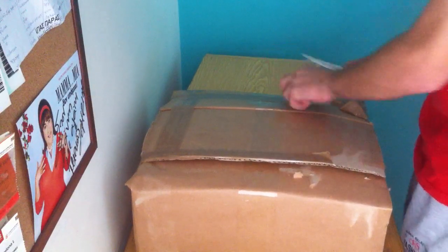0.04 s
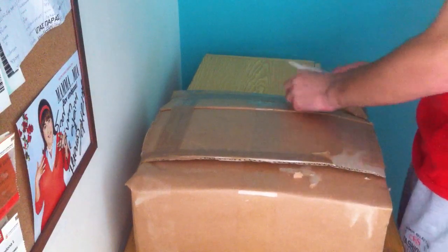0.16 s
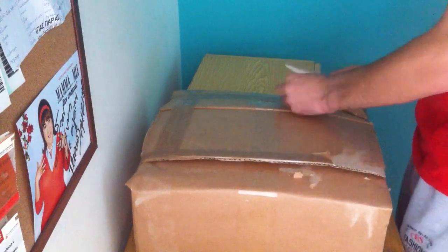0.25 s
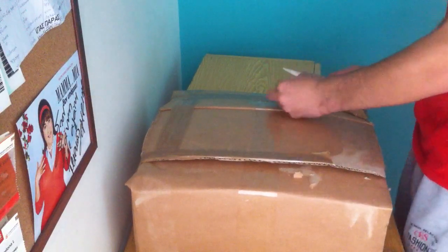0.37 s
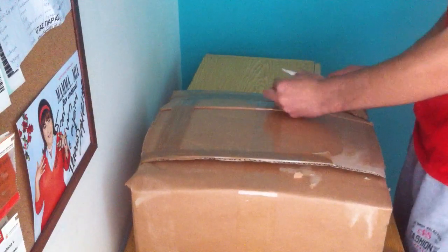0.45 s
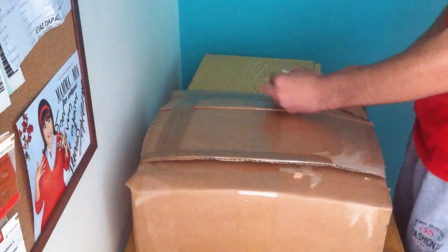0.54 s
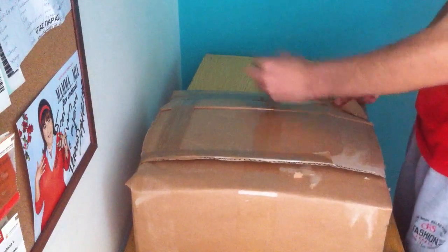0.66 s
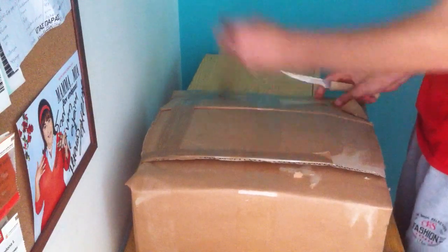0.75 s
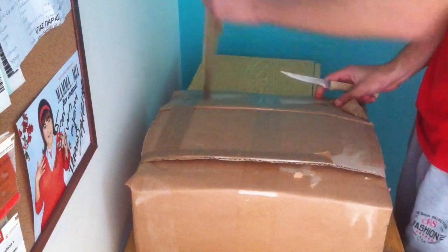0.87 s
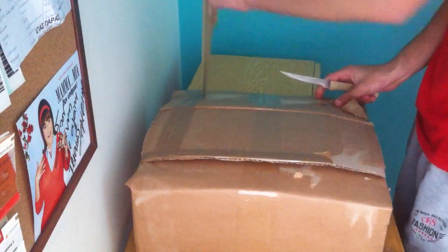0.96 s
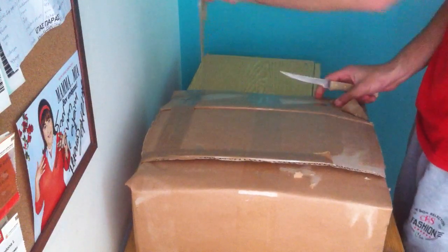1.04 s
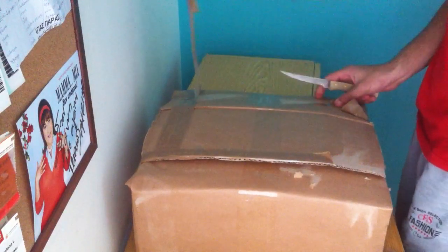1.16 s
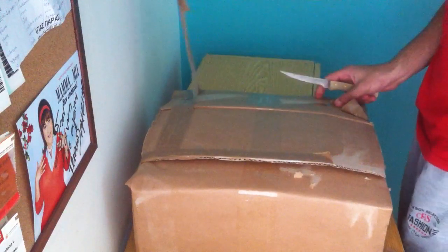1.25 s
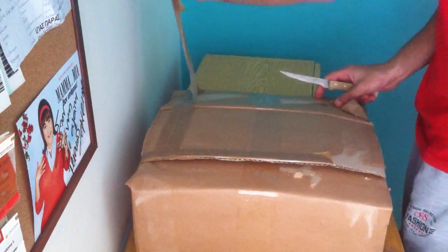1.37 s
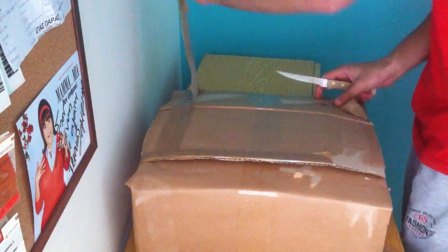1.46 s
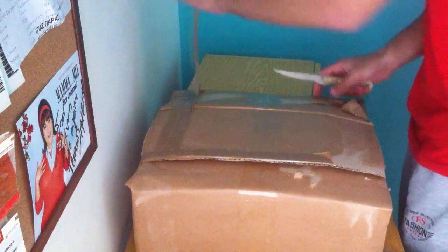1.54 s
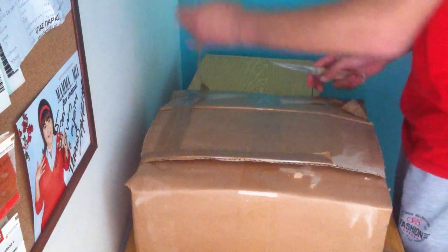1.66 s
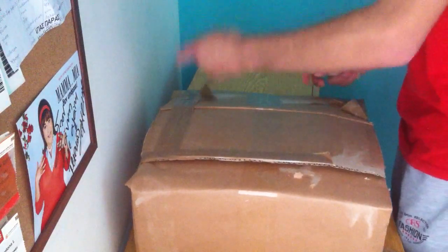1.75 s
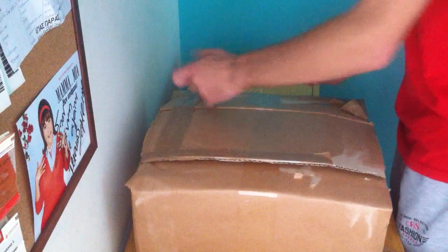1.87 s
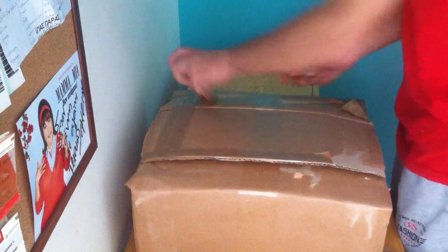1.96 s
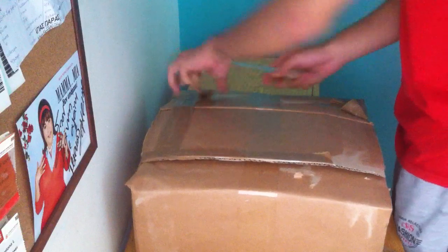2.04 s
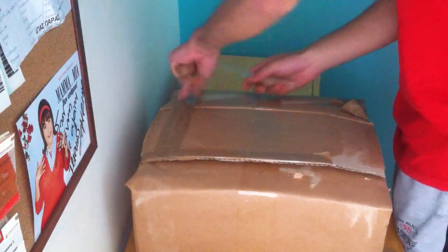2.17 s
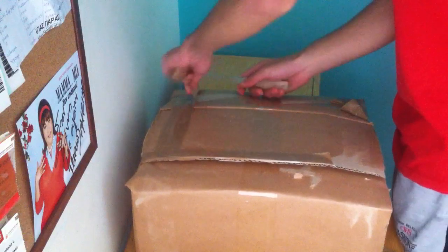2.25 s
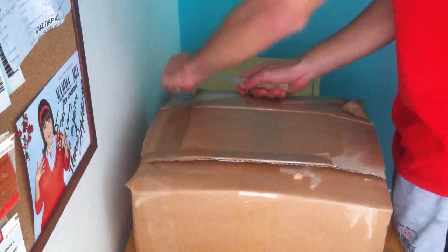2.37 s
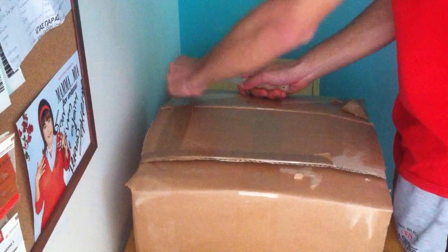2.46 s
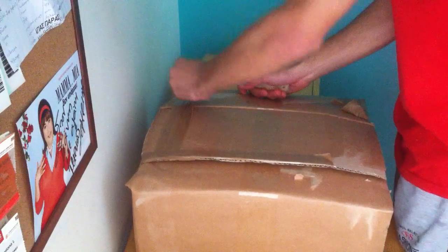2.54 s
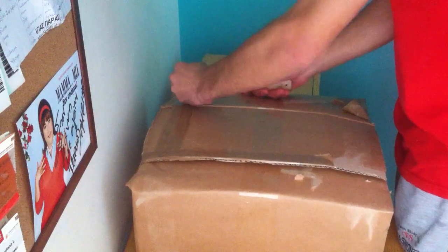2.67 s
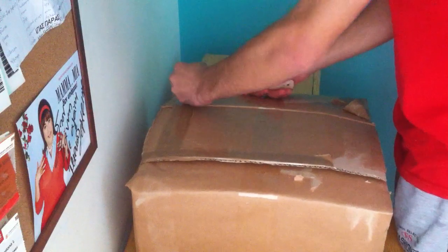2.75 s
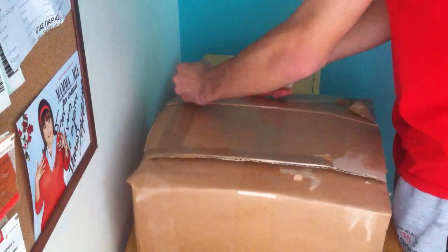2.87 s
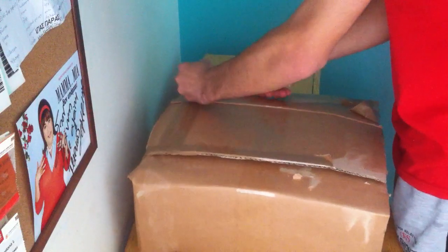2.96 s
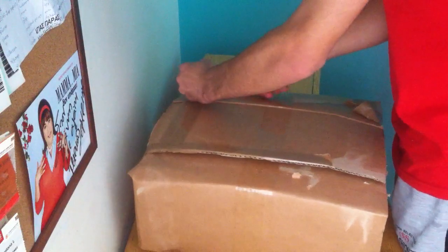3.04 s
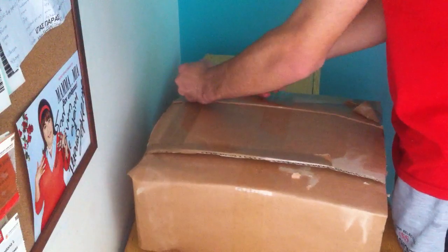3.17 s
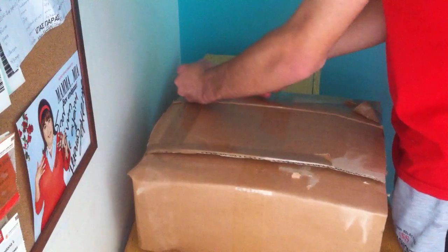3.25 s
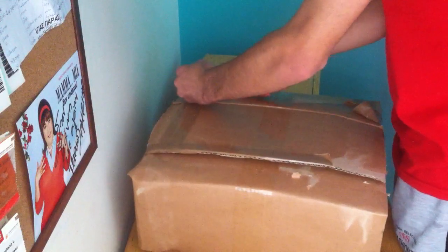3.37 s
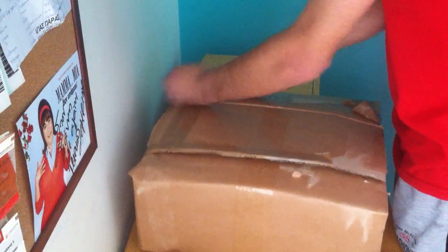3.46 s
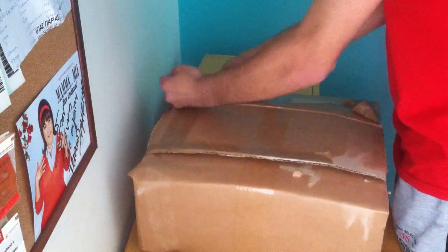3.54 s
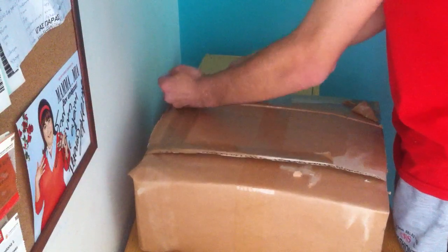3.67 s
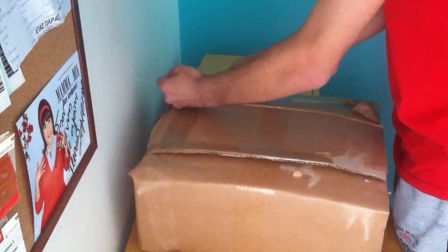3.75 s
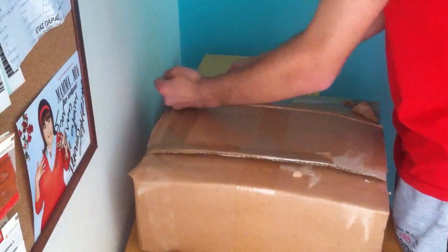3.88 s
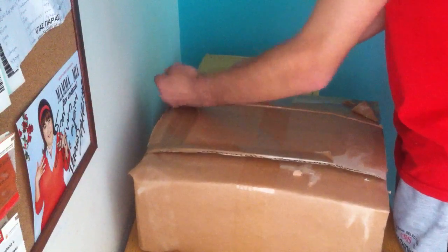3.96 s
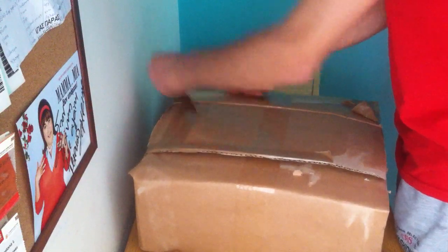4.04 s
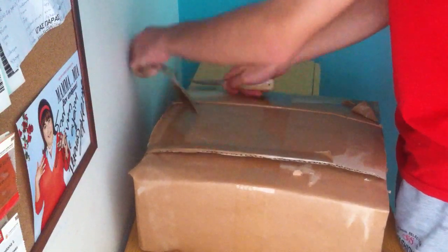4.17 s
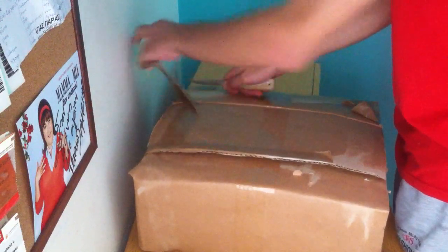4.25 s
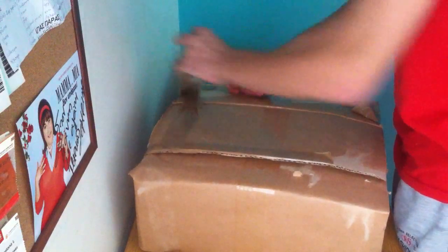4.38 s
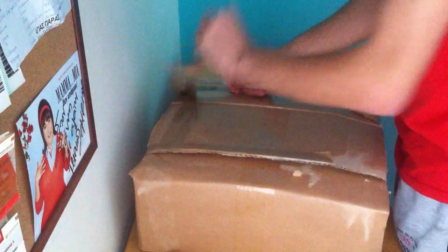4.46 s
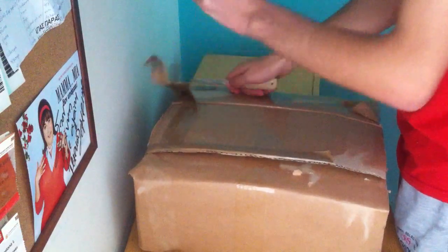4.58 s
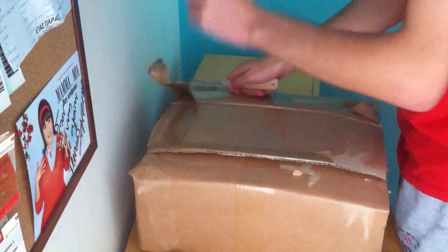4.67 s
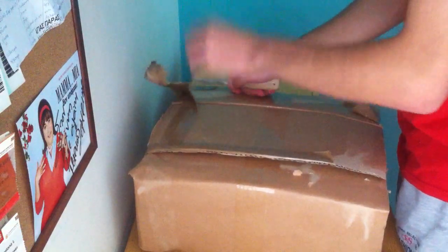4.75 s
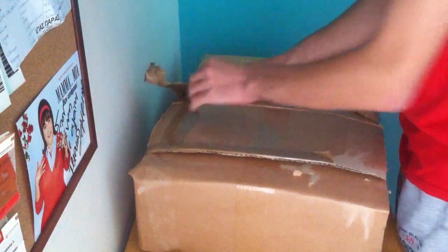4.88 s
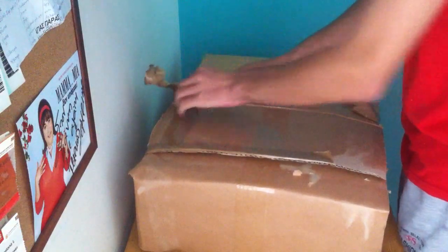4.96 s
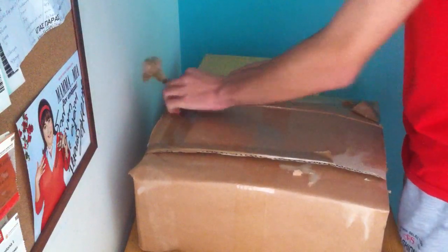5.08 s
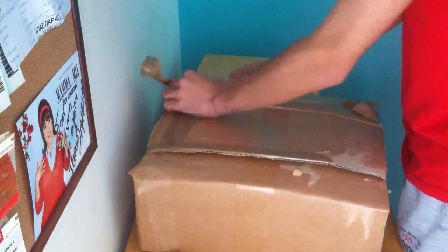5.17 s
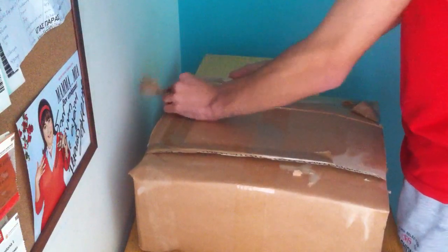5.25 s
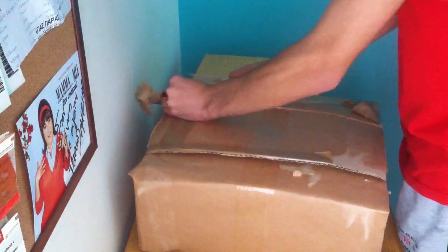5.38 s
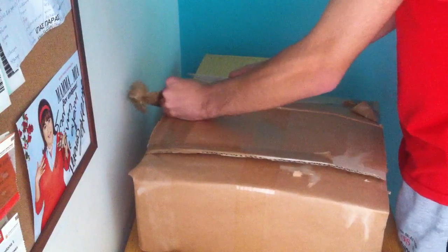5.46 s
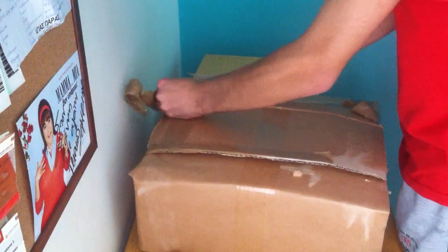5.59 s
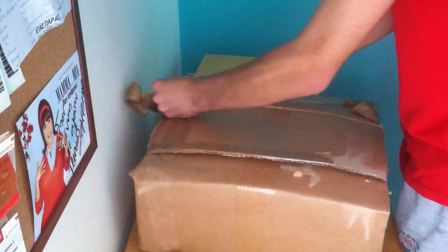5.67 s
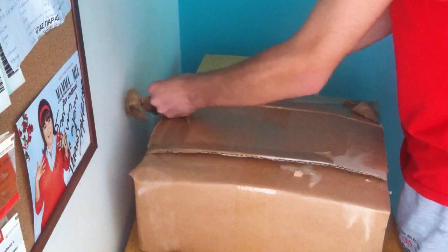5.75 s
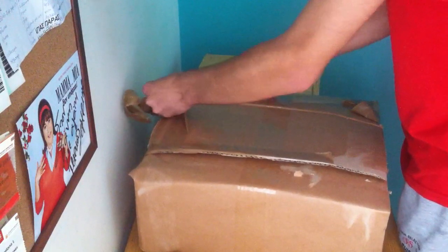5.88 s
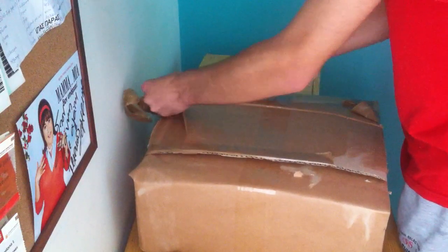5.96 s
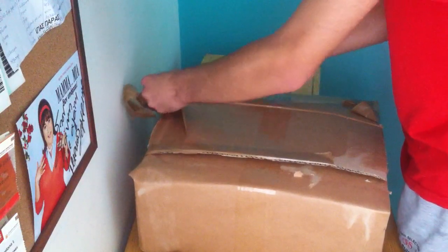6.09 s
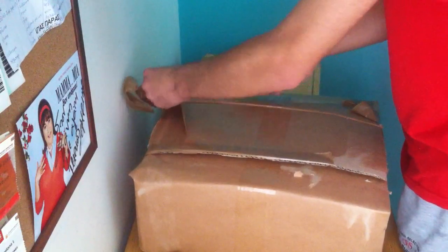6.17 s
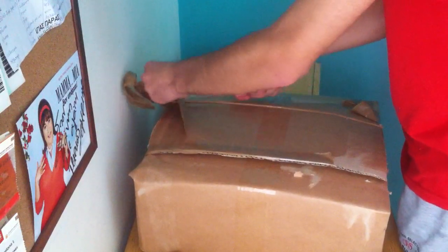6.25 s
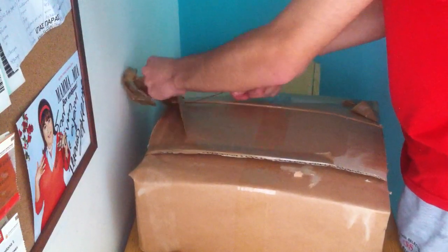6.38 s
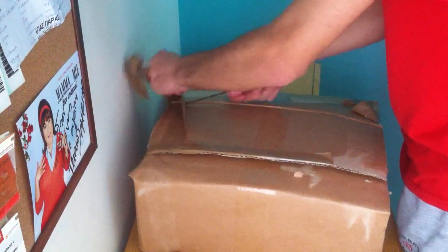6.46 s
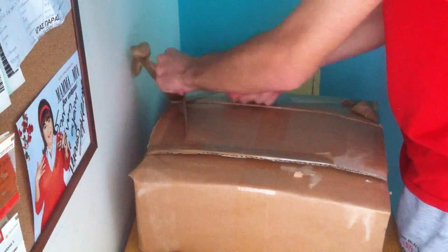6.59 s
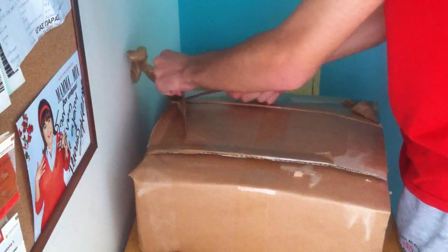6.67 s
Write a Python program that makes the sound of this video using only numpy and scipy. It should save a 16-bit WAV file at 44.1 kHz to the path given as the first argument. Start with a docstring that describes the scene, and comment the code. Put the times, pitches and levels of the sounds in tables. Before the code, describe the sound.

Packing tape is pulled off a big cardboard box in a small, bare room. From about 0.3 to 1.5 seconds a long peel rasps and crackles, peaking near 0.8 seconds in several quick snaps and a panel thump, followed by a low flutter. Soft tugs, small ticks and a quieter peel fill the time from about 1.7 to 3 seconds. At 3.6 seconds comes the loudest, sharpest snap, with another thump and a fading flutter. From 4 seconds on, short rasping tugs mix with more snaps and dull thumps, strongest near 4.2, 4.6 and 5.6 seconds, and the freed strip gives brief twangs. Smaller snaps and twangs near 6.2 seconds and a last short tug around 6.6 seconds close it. The walls add a short tail to every sound, over a faint steady hiss.

```python
"""Packing tape, slit with a knife, is pulled off a big cardboard box in a small, bare room.
First comes a long peel: the glue lets go in countless tiny slips that rasp and shake the panels.
Near 0.8 s the tape snaps several times and a panel thumps; a low flutter follows. Soft tugs and a quieter
peel lead to the loudest snap at 3.6 s, with another thump and flutter. From 4 s on, short tugs mix with
more snaps and thumps, and the freed strip twangs. The walls add a short tail to every sound."""
import sys
import numpy as np
from scipy import signal
from scipy.fft import rfft, irfft
from scipy.io import wavfile
from scipy.ndimage import uniform_filter1d

SR = 44100
rng = np.random.default_rng(int(sys.argv[2]) if len(sys.argv) > 2 else 0)


def wav_out(sig):
    """Save sig, one row per channel (or a flat mono array), as 16-bit PCM at SR to the path in sys.argv[1]."""
    wavfile.write(sys.argv[1], SR, np.round(np.clip(np.atleast_2d(sig).T, -1, 1) * 32767).astype(np.int16))


N = 296352

# the tape cracks or tears free: start_s, level_db, sharpness_db (higher is brighter), pitch_hz
TAPE_SNAPS = [(0.229, -53.5, -21, 810), (0.594, -43, -22, 680), (0.774, -35, -11.5, 686),
              (0.826, -26, -27, 1060), (0.842, -30.5, -5.5, 770), (0.861, -32.5, -22, 1010),
              (1.846, -57, -26, 695), (2.079, -51, -18, 1620), (2.134, -56, -10, 790),
              (2.279, -48, -21, 715), (2.323, -43.5, -19, 980), (2.601, -50.5, 5.5, 1140),
              (3.6, -17, -5, 3080), (3.646, -28.5, -28, 1800), (4.168, -29.5, -31, 1040),
              (4.18, -30, -23, 980), (4.447, -48.5, -23, 784), (4.584, -35, -22, 636),
              (5.555, -39.5, -19, 765), (5.642, -27, -14, 640), (5.946, -38, -15, 930),
              (6.165, -49.5, -21, 1720), (6.25, -40.5, -24, 770)]
# the bright tone of crackling tape: pitch_hz, level_db
CRACKLE_TONE = [(1200, -37.5), (2800, 7), (4000, 6.5), (5200, 2), (6500, -5.5), (8300, -4.5),
                (11000, -18.5), (15000, -40)]


def from_db(db):
    """Turn decibels into a number to multiply by."""
    return 10 ** (np.asarray(db) / 20)


def rms_one(x):
    """Scale a sound so that its average level (rms) is 1."""
    return x / np.sqrt(np.mean(x ** 2) + 1e-20)


def unit_energy(x):
    """Scale a sound so that its squares add up to 1."""
    return x / np.sqrt(np.sum(x ** 2) + 1e-20)


def at_hz(points, hz):
    """Read between the rows of a table, giving each octave equal room."""
    known_hz, values = np.transpose(points)
    return np.interp(np.log(np.maximum(hz, 1)), np.log(known_hz), values)


def add(track, start_s, sound):
    """Mix a sound into a track at the given time."""
    start = int(round(start_s * SR))
    track[start:start + len(sound)] += sound[:N - start]


def colour(x, tone, size=4096):
    """Filter a sound to the tone in a table of pitch_hz, level_db."""
    gains = from_db(at_hz(tone, np.fft.rfftfreq(size, 1 / SR)))
    cepstrum = irfft(np.log(gains))
    cepstrum[1:size // 2] *= 2   # fold it so that the filter rings after a click, never before
    cepstrum[size // 2 + 1:] = 0
    response = irfft(np.exp(rfft(cepstrum)))
    return signal.fftconvolve(x, response)[:len(x)]


def resonate(x, hz, width_hz):
    """Make a sound ring at one pitch; a narrower width rings longer."""
    r = np.exp(-np.pi * width_hz / SR)
    feedback = [1, -2 * r * np.cos(2 * np.pi * hz / SR), r * r]
    return (1 - r * r) / 2 * signal.lfilter([1, 0, -1], feedback, x + 1e-18)


def arch(length_s):
    """Half a sine wave: a swell and a fade."""
    return np.abs(np.sin(np.linspace(0, np.pi, int(length_s * SR))))


def drift(per_s):
    """A curve that wanders between random values."""
    knots = rng.standard_normal(int(N / SR * per_s) + 2)
    return rms_one(np.interp(np.arange(N) / SR * per_s, np.arange(len(knots)), knots))


def slips(per_s, spread_db, clump_db):
    """Tiny slips click in uneven clumps, while the average pull stays even."""
    slipping = rng.random(N) < per_s / SR
    sizes_db = spread_db * np.clip(rng.standard_normal(N), -2, 2) + clump_db * drift(per_s=140)
    clicks = slipping * from_db(sizes_db) * rng.choice([-1, 1], N)
    local_power = np.abs(uniform_filter1d(clicks ** 2, size=1500))
    return clicks / np.sqrt(local_power + 1e-6)


def hush(level_db=-68.5):
    """Faint, steady noise from the room and the electronics."""
    # the tone of that noise: pitch_hz, level_db
    hush_tone = [(18, -67), (30, -32), (53, -23), (95, -16.5), (152, -6), (187, -6), (467, -12.5),
                 (532, -12), (1140, -14.5), (1970, -18), (3400, -19), (4540, -21), (15500, -26)]
    return from_db(level_db) * rms_one(colour(rng.standard_normal(N), hush_tone))


def reflections(build_s=0.002, size=32768):
    """The walls answer a click with a blur of echoes whose treble dies first."""
    # how long the room takes to fade by 60 dB: pitch_hz, fade_s
    fade_times = [(125, 0.49), (350, 0.37), (1000, 0.33), (3000, 0.31), (8000, 0.3), (15000, 0.19)]
    t, hz = np.arange(size) / SR, np.fft.rfftfreq(size, 1 / SR)
    noise_spectrum, tail = rfft(rng.standard_normal(size)), 0
    edges_hz = np.r_[0, np.geomspace(150, SR / 2, num=16)]
    for low, high in zip(edges_hz, edges_hz[1:]):
        fade_s = at_hz(fade_times, (low + high) / 2)
        band = irfft(noise_spectrum * ((hz >= low) & (hz < high)))
        envelope = from_db(-60 * t / fade_s) * (1 - np.exp(-t / build_s))
        energy = (high - low) * fade_s   # wider, longer bands hold more
        tail = tail + np.sqrt(energy) * unit_energy(band * envelope)
    return unit_energy(tail)


def room(x, patterns=8):
    """One pattern of echoes blends into the next as the hands move along the box."""
    out, hop = np.zeros(N), N // (patterns - 1) + 1
    for k in range(patterns):
        span = np.arange(max(0, (k - 1) * hop), min(N, (k + 1) * hop))
        blend = np.cos(np.pi / 2 * (span / hop - k))
        add(out, span[0] / SR, signal.fftconvolve(x[span] * blend, reflections()))
    return out


def ring_along(x, gain_db=-3):
    """Resonances of the room and the box ring along with a sound."""
    # room and box resonances: pitch_hz, width_hz, level_db (relative to the plain sound)
    resonances = [(126.7, 12, -2), (173, 10.2, -1), (256.3, 13.5, 4.5), (345, 32, -2), (630, 44, -19),
                  (718, 53, -8), (827, 2.1, -23), (1010, 28, 1), (1109, 69, -3), (1274, 24, 0),
                  (2230, 7, 4), (2890, 7.2, -11.5)]
    ringing = sum(from_db(db) * resonate(x, hz, width_hz) for hz, width_hz, db in resonances)
    return from_db(gain_db) * (x + ringing)


def scrapes():
    """Tape and fingers rub: each stroke swells and fades around one pitch."""
    # rubbing strokes: start_s, length_s, level_db, pitch_hz, width_hz
    strokes = [(0.328, .2, -53.5, 650, 400), (0.498, 0.28, -58.5, 697, 170),
               (0.808, 0.13, -64, 14200, 2200), (1.113, 0.26, -58, 1610, 615),
               (1.674, 0.042, -68, 4000, 400), (2.428, .24, -72, 4050, 3760),
               (2.988, .08, -70.5, 2370, 900), (3.592, 0.046, -48, 3030, 2200),
               (3.74, 0.087, -57, 750, 575), (3.99, 0.086, -68.5, 1740, 1480),
               (4.778, 0.051, -57, 970, 666), (4.783, 0.051, -67, 2180, 300),
               (5.437, 0.053, -60, 1550, 1180), (5.712, 0.24, -63.5, 1680, 600)]
    out, friction = np.zeros(N), slips(per_s=2000, spread_db=3.5, clump_db=3.5)
    for start_s, length_s, level_db, hz, width_hz in strokes:
        swell = arch(length_s)
        clicks = friction[int(start_s * SR):][:len(swell)]
        rub = resonate(resonate(clicks, hz, width_hz), hz, 2 * width_hz)
        add(out, start_s, from_db(level_db) * swell * rms_one(rub))
    return out


def swing(hz, cycles, size=2048):
    """A dull pulse: a wave that swings out and back about once."""
    turns = hz * np.arange(size) / SR
    return np.sin(2 * np.pi * turns) * np.exp(-(turns / cycles) ** 2)


def flutters(flutter_hz=210, fade_db=-18, jitter_s=0.00222, uneven_db=2.5):
    """A low, uneven flutter of quick pulses that dies away."""
    # runs of pulses: start_s, end_s, level_db, pulses_per_s
    runs = [(1.061, 1.27, -50, 56), (3.757, 3.99, -37, 60), (4.869, 5.112, -43.5, 48)]
    out = np.zeros(N)
    for start_s, end_s, level_db, pulses_per_s in runs:
        pulses = np.arange(start_s, end_s, 1 / pulses_per_s)
        for pulse_s, (late, hard) in zip(pulses, rng.standard_normal(size=(40, 2))):
            progress = (pulse_s - start_s) / (end_s - start_s)
            pulse_db = level_db + fade_db * progress + uneven_db * hard
            add(out, pulse_s + jitter_s * late, from_db(pulse_db) * swing(flutter_hz, cycles=0.8))
    return out


def twangs(rise_s=0.00081, sag_per_s=0.63, size=8192):
    """A tight strip of tape rings briefly, sinking in pitch as it slackens."""
    # plucks of the strip: start_s, level_db, pitch_hz, fade_s (time to fall by 60 dB)
    plucks = [(4.134, -44, 1120, 0.026), (4.145, -40, 740, 0.08), (4.178, -33, 542, .075),
              (4.195, -36.5, 1002, 0.17), (4.80, -51.5, 890, 0.22), (5.643, -34.5, 700, 0.091),
              (6.166, -36, 443, 0.021), (6.250, -39, 627, 0.072)]
    out, t = np.zeros(N), np.arange(size) / SR
    for start_s, level_db, hz, fade_s in plucks:
        envelope = from_db(level_db - 60 * t / fade_s) * (1 - np.exp(-t / rise_s))
        turns = hz * t * (1 - sag_per_s * t / 2)
        add(out, start_s, envelope * np.sin(2 * np.pi * turns))
    return out


def thumps(gain_db=3):
    """A panel springs back or a hand lands on it; cardboard hardly rings, so it thumps."""
    # single panel swings: start_s, level_db, pitch_hz
    knocks = [(0.193, -46.5, 252), (0.823, -25, 570), (0.833, -17.5, 297), (0.864, -33, 187),
              (2.356, -47, 169), (2.513, -44.5, 272), (3.601, -17.5, 360), (4.187, -48, 282),
              (4.264, -38.5, 280), (4.585, -33.5, 340), (5.146, -48, 235), (5.493, -40.5, 283),
              (5.644, -33.5, 310), (5.672, -35.5, 275), (6.434, -46.5, 396)]
    out = np.zeros(N)
    for start_s, level_db, hz in knocks:
        add(out, start_s, from_db(level_db + gain_db) * swing(hz, cycles=0.89))
    return out


def fibre_run(tear_s, size=4096):
    """Fibres give way in a quickly dying run, so many that all pitches sound evenly."""
    fade = np.exp(-np.arange(size) / SR / max(tear_s, 1e-4))
    spectrum = rfft(rng.laplace(size=size) * fade)
    even_noise = irfft(spectrum / (np.abs(spectrum) + 1e-12))
    return unit_energy(even_noise * np.sqrt(fade))


def snaps(crack_db=19, patch_db=15, treble_db=19, tear_s=0.0058, doubling_db=25):
    """The tape cracks, then a run of fibres tears; the patch around it adds its own pitch."""
    # the tone of a crack: pitch_hz, level_db
    crack_tone = [(40, -11), (90, -17), (140, 5), (350, -0.5), (700, -1.5), (1100, -4.5), (1600, -3),
                  (2600, -3), (4000, -9), (8000, -33)]
    out = np.zeros(N)
    for start_s, level_db, sharpness_db, hz in TAPE_SNAPS:
        tear = fibre_run(tear_s * 2 ** (-sharpness_db / doubling_db))   # dull tears last longer
        tear[0] += 0.71 * from_db(0.4 * sharpness_db)   # and start with a softer click
        crack = unit_energy(colour(tear, crack_tone))
        patch = from_db(patch_db) * unit_energy(resonate(crack, hz, width_hz=0.35 * hz))
        treble = from_db(treble_db + sharpness_db) * unit_energy(colour(tear, CRACKLE_TONE))
        add(out, start_s, from_db(level_db) * (from_db(crack_db) * crack + patch + treble))
    return out


def crackle_share_db(rasp_db, easy_pull_db=-52, easy_share_db=-11.5, growth=0.032):
    """A harder pull crackles a little more, relative to its rasp."""
    return easy_share_db + growth * (rasp_db - easy_pull_db)


def pulls(run_on_db=-20.5, run_on_fade_s=0.25, run_on_rumble_db=-14, run_on_crackle_db=7.5):
    """Give each movement of the tape as start_s, rasp gain, rumble_db, crackle_db (relative to rasp)."""
    # long peels, one list of points each: time_s, rasp_db, rumble_db (relative to the rasp)
    peels = [
        [(0.31, -62.5, 2), (0.426, -43.5, -14.5), (0.518, -54.5, -12), (0.764, -53, 2), (0.83, -30.5, -7),
         (0.968, -47, -8), (1.118, -54, -1.5), (1.258, -55, -2), (1.476, -70.5, -16), (1.5, -78, 6)],
        [(2.35, -65, -8), (2.434, -62, -8), (2.49, -58, -13), (2.514, -57, -2), (2.602, -59, -9.5),
         (2.95, -73.5, -4.5)],
    ]
    # short tugs that swell and fade: start_s, length_s, rasp_db, rumble_db (relative to the rasp)
    tugs = [(1.66, 0.062, -66, -1), (1.83, 0.17, -70.5, -7), (3.36, 0.64, -66.5, -5),
            (4.112, 0.045, -54.5, -8), (4.239, 0.077, -51, 0.5), (4.355, 0.66, -63, -3),
            (4.57, 0.052, -52, -3), (4.66, 0.075, -62, 9), (4.77, 0.067, -60, 11), (5.201, 0.16, -61.5, -2),
            (5.362, 0.18, -53.5, 0), (5.546, 0.086, -58.5, -1), (5.675, 0.29, -57.5, -7),
            (5.974, 0.11, -68, -12), (6.549, 0.097, -61, 1.5)]
    for peel in peels:
        times_s, rasp_db, rumble_db = np.transpose(peel)
        t = np.arange(times_s[0], times_s[-1], 1 / SR)
        pull_db = np.interp(t, times_s, rasp_db)
        yield times_s[0], from_db(pull_db), np.interp(t, times_s, rumble_db), crackle_share_db(pull_db)
    for start_s, length_s, rasp_db, rumble_db in tugs:
        rounded_swell = arch(length_s) ** 0.62
        yield start_s, from_db(rasp_db) * rounded_swell, rumble_db, crackle_share_db(rasp_db)
    # after each snap the tape runs on and stops; a sharper snap leaves more crackle
    stopping_db = -60 * np.arange(SR) / SR / run_on_fade_s
    for start_s, level_db, sharpness_db, _ in TAPE_SNAPS:
        run_on = from_db(level_db + run_on_db + stopping_db)
        yield start_s, run_on, run_on_rumble_db, run_on_crackle_db + sharpness_db


def peeling(rasp_gain_db=-1.0, rumble_gain_db=-1.1, crackle_gain_db=-1.5):
    """The same glue slips rasp in the strip and shake the panels; finer ones crackle as it lifts."""
    # the tone of the rasping strip: pitch_hz, level_db
    rasp_tone = [(200, -32), (420, 5), (700, 6), (1100, -1), (1800, -0.5), (2700, -8), (4000, -27),
                 (8000, -61)]
    # the tone of the shaking panels: pitch_hz, level_db
    rumble_tone = [(40, -24), (80, -30.5), (120, 0), (200, -3.5), (330, 1.5), (480, 1.5), (900, -28.5),
                   (3000, -63)]
    rasp_curve, rumble_curve, crackle_curve = np.zeros((3, N))
    for start_s, pull, rumble_db, crackle_db in pulls():
        add(rasp_curve, start_s, pull)
        add(rumble_curve, start_s, pull * from_db(rumble_db))
        add(crackle_curve, start_s, pull * from_db(crackle_db))
    coarse = slips(per_s=2400, spread_db=4, clump_db=4)
    fine = coarse + slips(per_s=4000, spread_db=5, clump_db=6)
    rasp = from_db(rasp_gain_db) * rasp_curve * rms_one(colour(coarse, rasp_tone))
    rumble = from_db(rumble_gain_db) * rumble_curve * rms_one(colour(coarse, rumble_tone))
    crackle = from_db(crackle_gain_db) * crackle_curve * rms_one(colour(fine, CRACKLE_TONE))
    return rasp + rumble + crackle


def scene(tape_direct_db=-2, tape_room_db=-2.0, accent_direct_db=-1, accent_room_db=-6):
    """Tape and box sound into the room; thumps, flutters and twangs carry less echo."""
    tape = ring_along(peeling() + snaps()) + scrapes()
    accents = ring_along(thumps()) + flutters() + twangs()
    direct = from_db(tape_direct_db) * tape + from_db(accent_direct_db) * accents
    reflected = room(from_db(tape_room_db) * tape + from_db(accent_room_db) * accents)
    return (direct + reflected)[None]


def record(dry, bass_cut_hz=116, bass_leak_db=-25, treble_cut_hz=15950):
    """A small microphone loses the deep bass; the hush is added and the highest treble is cut."""
    bass_cut = signal.butter(8, bass_cut_hz, "high", fs=SR, output="sos")
    treble_cut = signal.ellip(12, .1, 80, treble_cut_hz, fs=SR, output="sos")
    thin = signal.sosfilt(bass_cut, dry) + from_db(bass_leak_db) * dry
    return signal.sosfilt(treble_cut, thin + hush())


dry = scene()
out = record(dry)
wav_out(out)
```